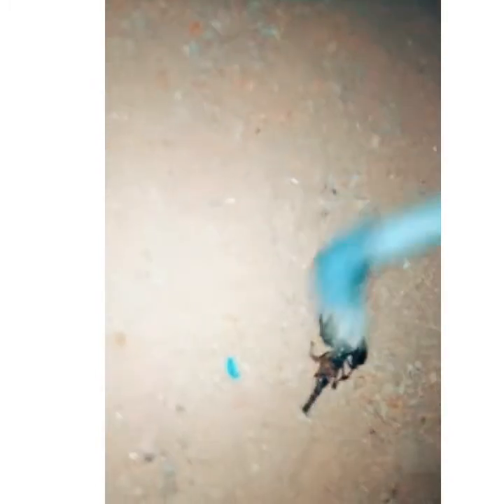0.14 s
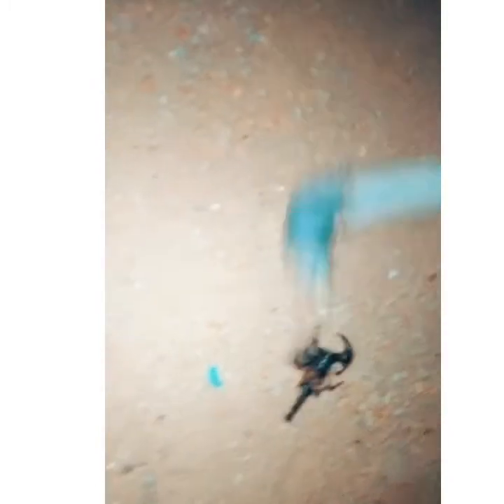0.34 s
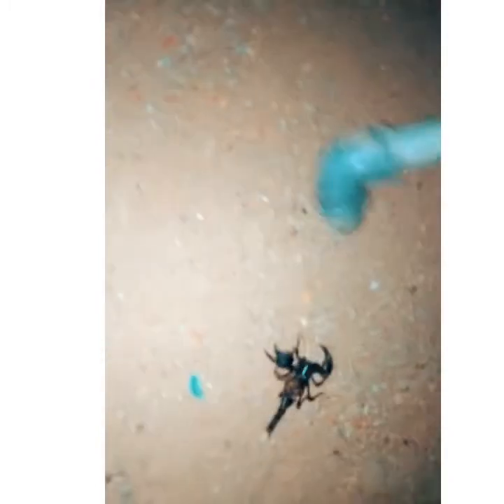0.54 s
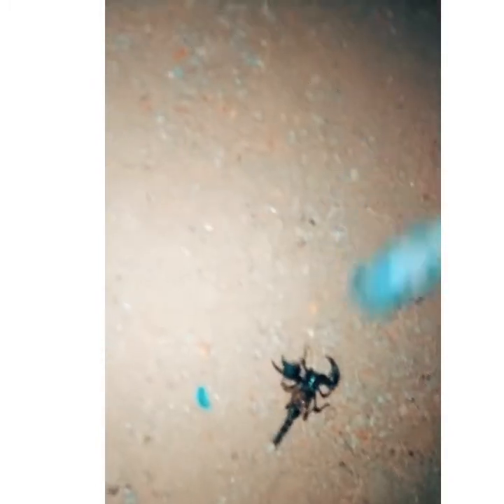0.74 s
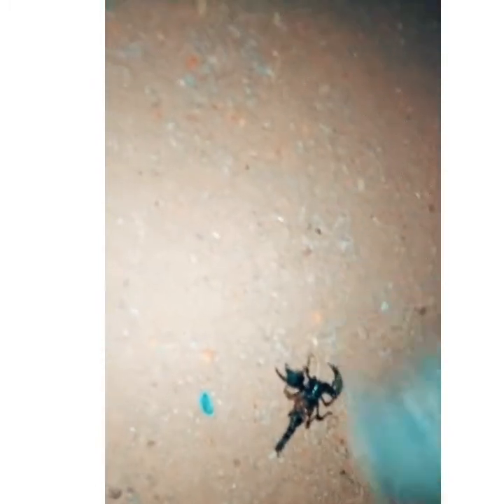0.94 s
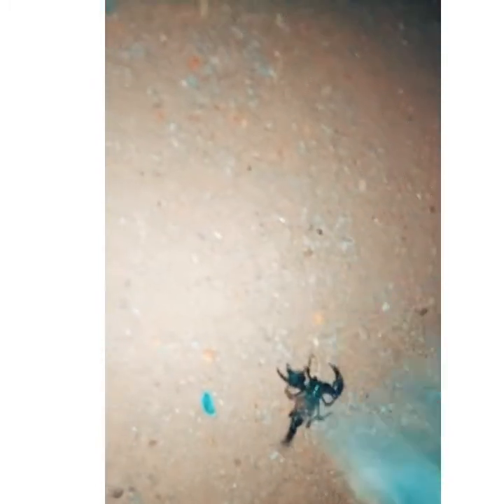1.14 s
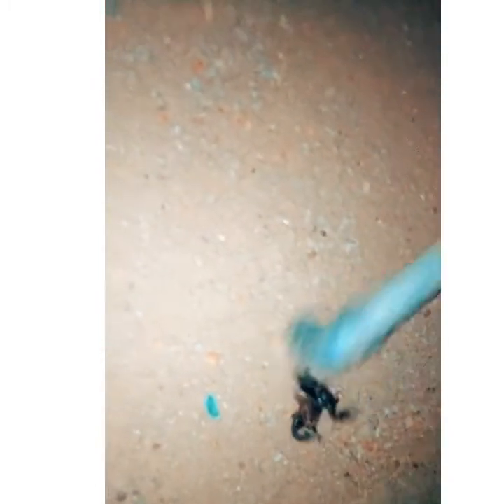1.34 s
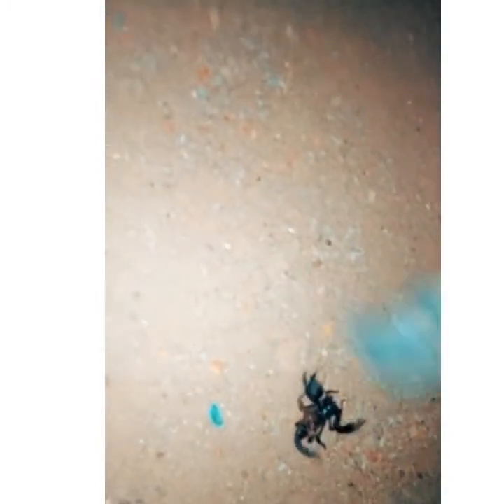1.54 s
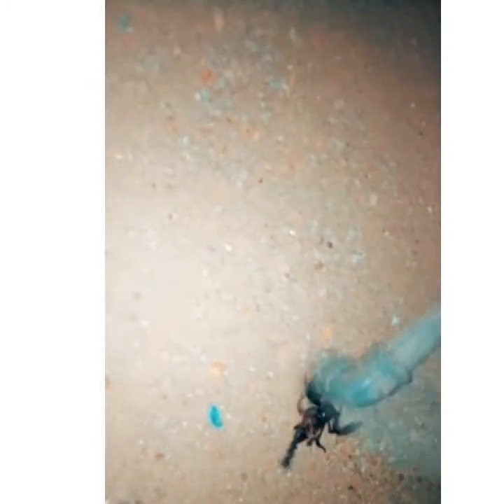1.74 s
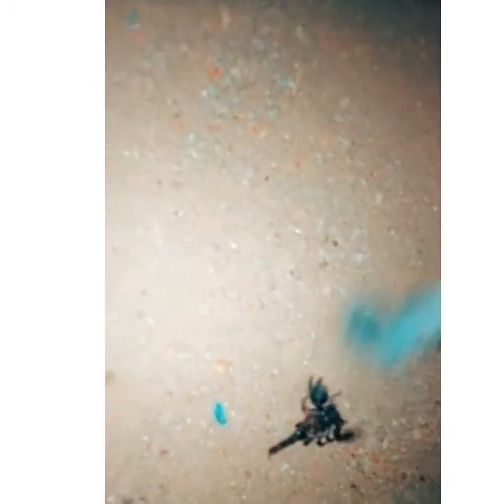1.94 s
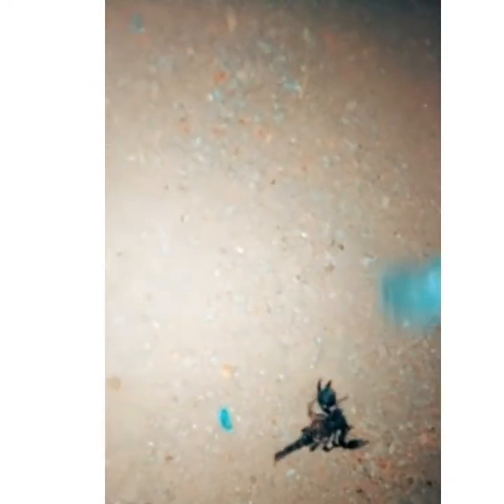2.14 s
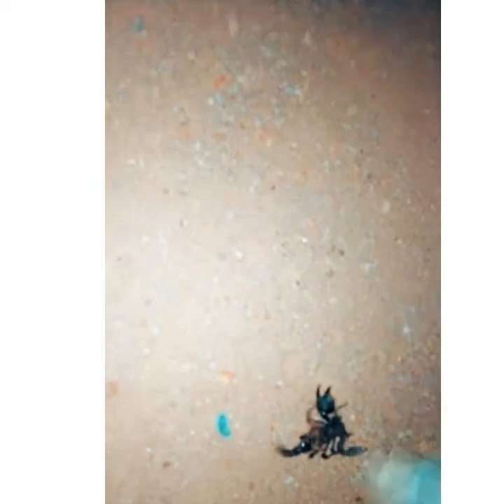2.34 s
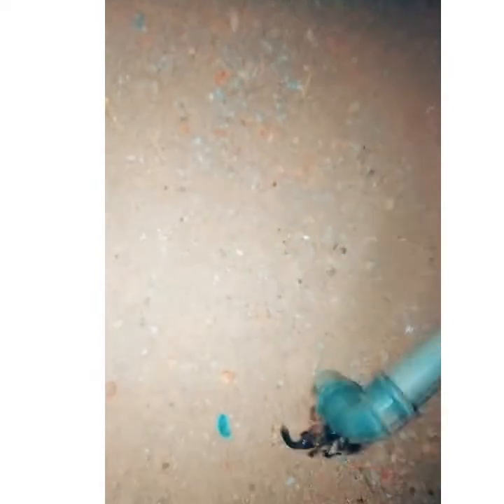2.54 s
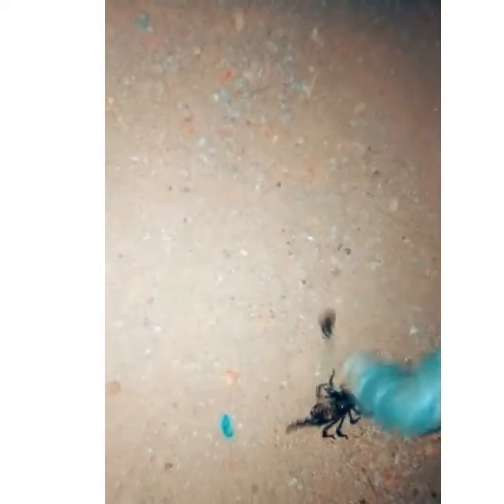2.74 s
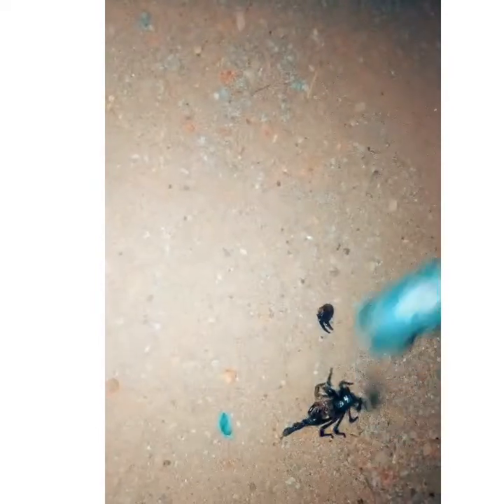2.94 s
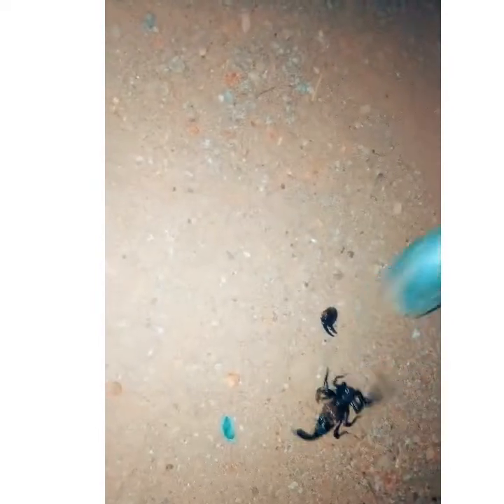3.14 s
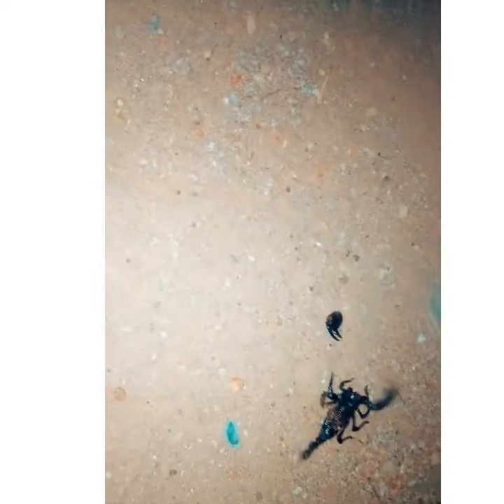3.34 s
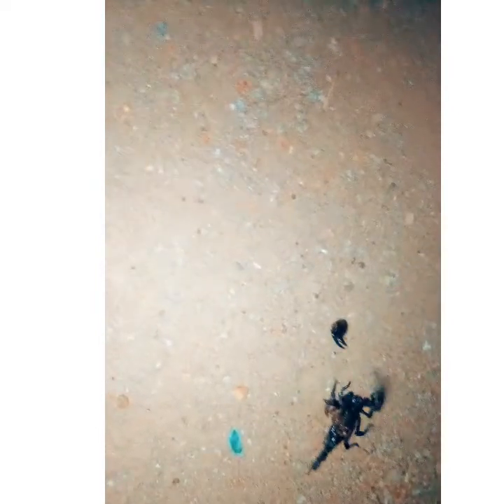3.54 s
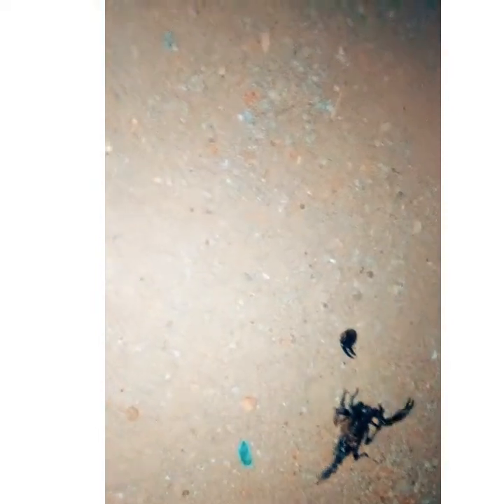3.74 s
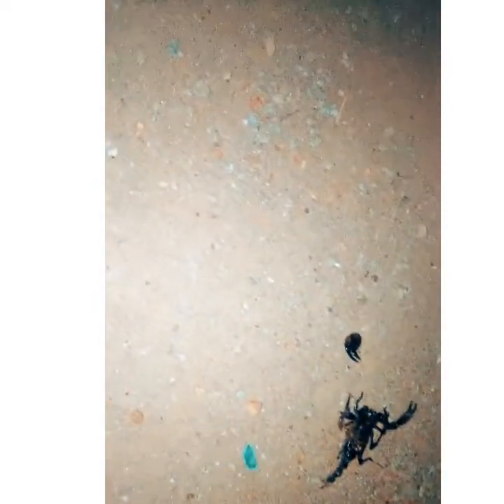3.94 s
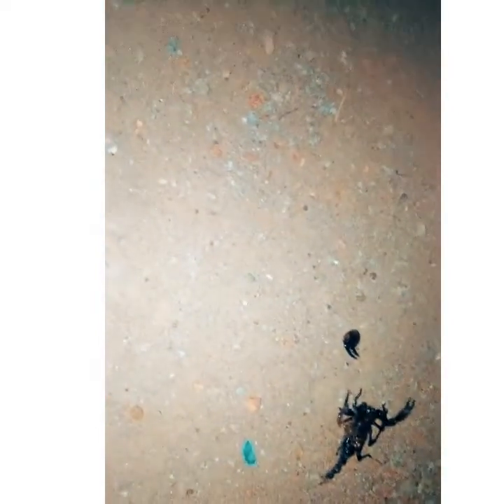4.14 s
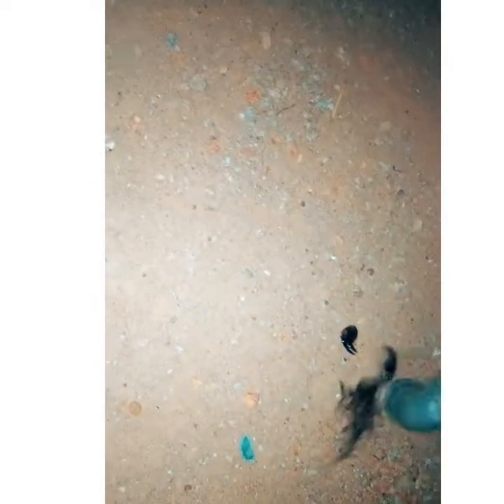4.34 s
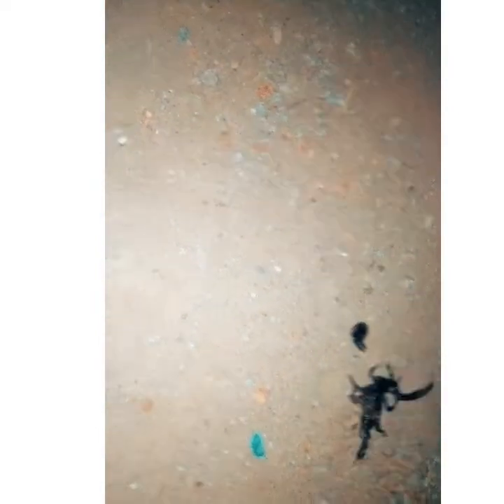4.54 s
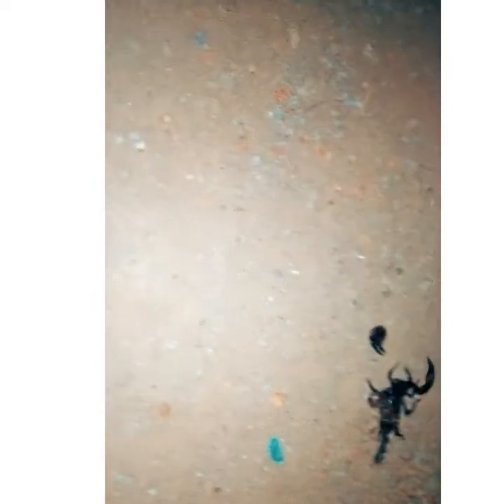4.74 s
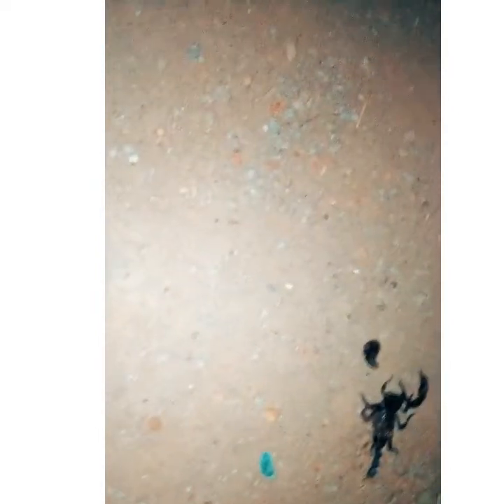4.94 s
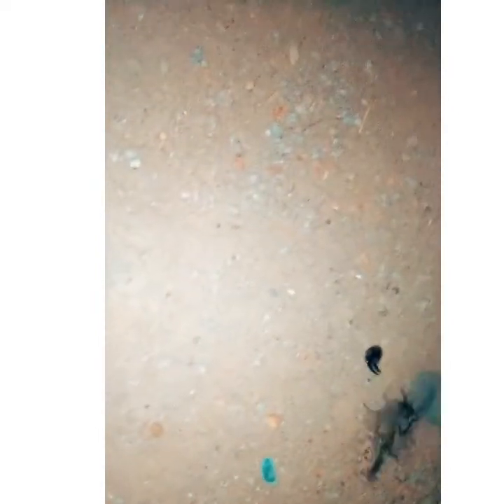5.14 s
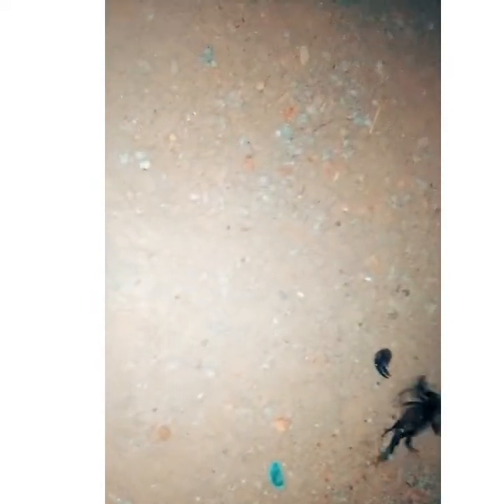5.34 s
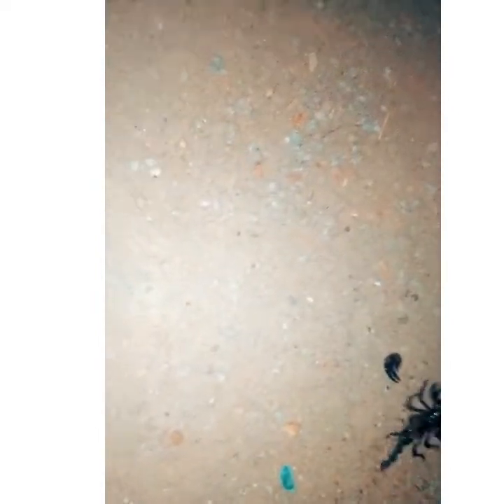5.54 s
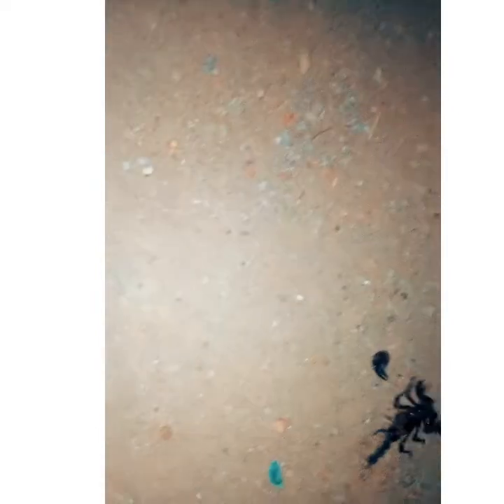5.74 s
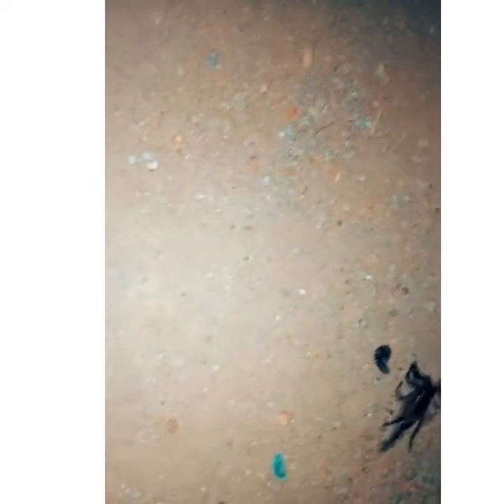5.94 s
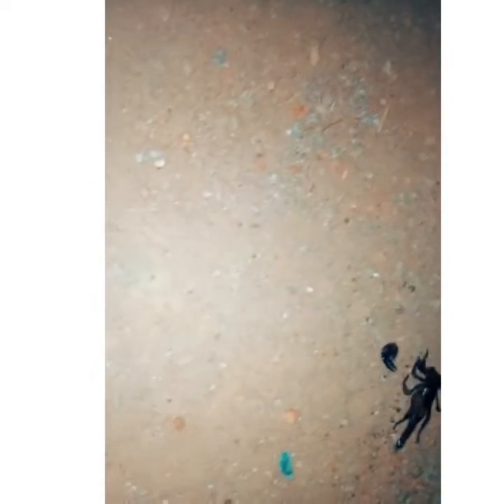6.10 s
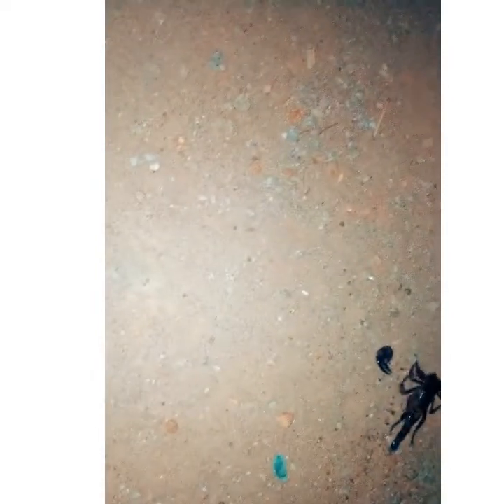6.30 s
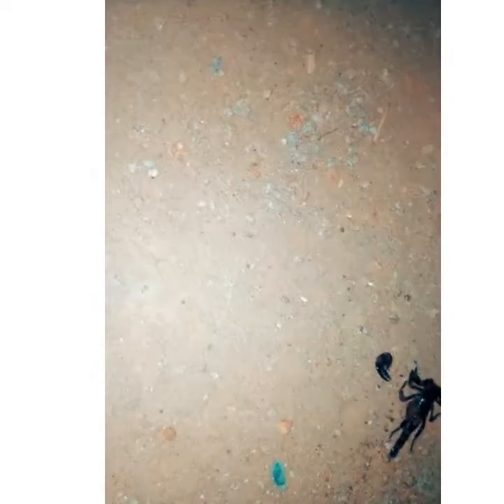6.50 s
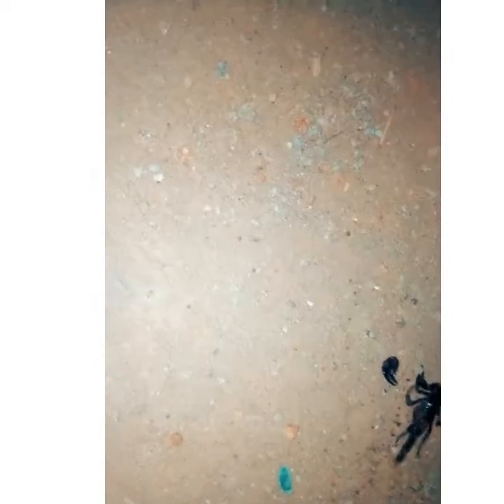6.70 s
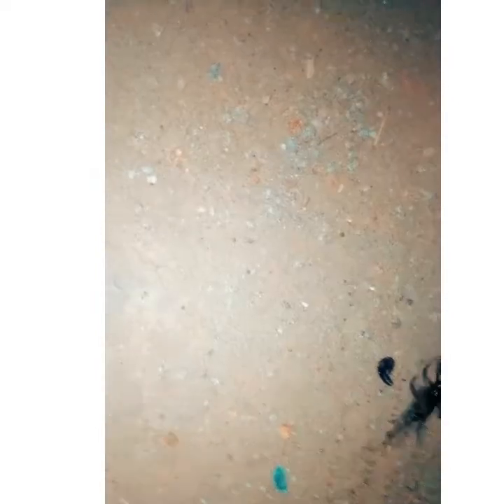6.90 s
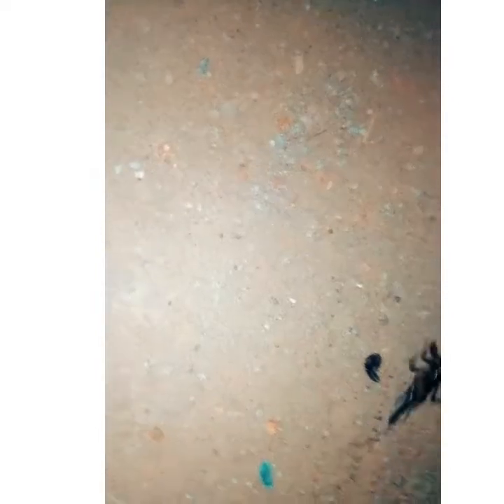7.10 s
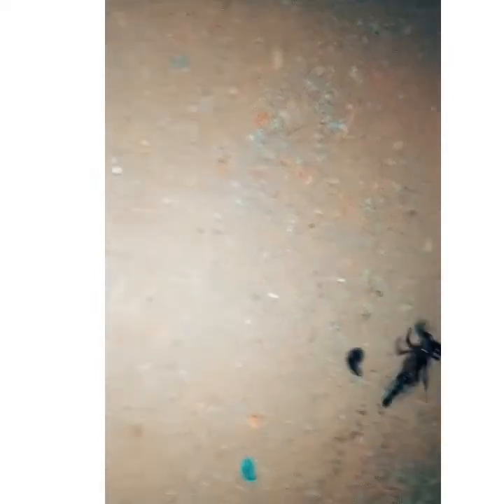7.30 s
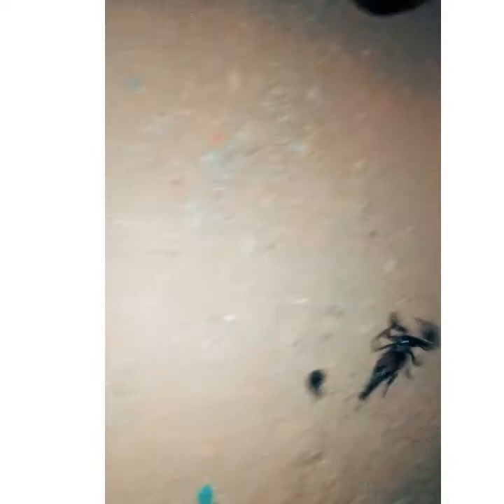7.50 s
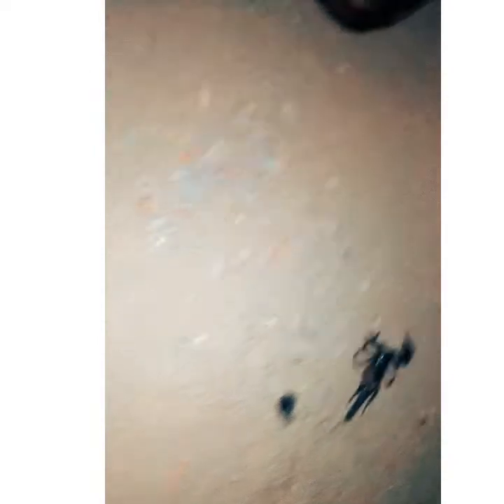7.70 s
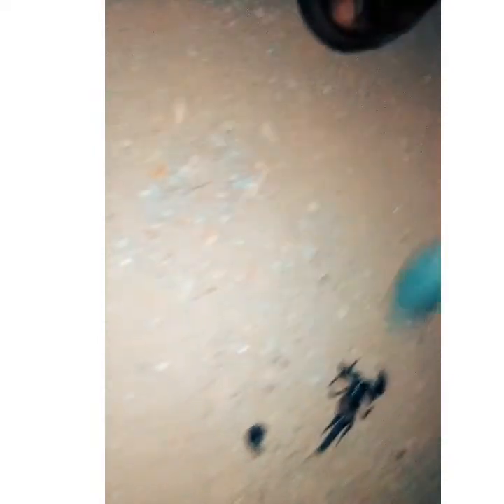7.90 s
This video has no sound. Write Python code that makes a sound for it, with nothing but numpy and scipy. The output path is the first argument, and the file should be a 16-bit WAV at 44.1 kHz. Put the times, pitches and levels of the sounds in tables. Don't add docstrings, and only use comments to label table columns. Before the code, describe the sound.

A hollow plastic pipe elbow knocks gritty concrete in loud, irregular cracks with small bouncing rattles, over faint night crickets and distant hum.

```python
import sys
import numpy as np
from scipy import signal
from scipy.fft import rfft, irfft, next_fast_len
from scipy.io import wavfile
from scipy.ndimage import map_coordinates

SR = 44100
rng = np.random.default_rng(int(sys.argv[2]) if len(sys.argv) > 2 else 0)


def unload_audio(sound):
    columns = np.transpose(np.atleast_2d(sound))
    steps = np.round(np.clip(columns, -1, 1) * 32767)
    wavfile.write(sys.argv[1], SR, steps.astype(np.int16))


def attenuation_scalar(level_db):
    decades = np.asarray(level_db, float) / 20
    return 10 ** decades


N = 350991

# pitch_hz, level_db (per Hz)
NIGHT_COLOR = [(20, -5), (50, 1.5), (100, 0.5), (250, -7.5), (700, -11.5), (2000, -17), (5300, -18.5),
               (7300, -25.5), (8000, -30), (11000, -31.5), (14000, -32.5), (15000, -19.5), (15400, -23),
               (15600, -62.5)]
# pitch_hz, level_db (rms)
CIRCUIT_WHINE = (11000, -100)
# pitch_hz, width_hz, level_db (rms), pulses_per_s, swell_db
CRICKET_CROWDS = [(4215, 170, -84, 21, 6), (5857, 230, -66, 59, 2), (6035, 160, -66.5, 28, 1),
                  (6510, 550, -70, 31, 4), (7036, 420, -77, 24, 0.5)]
# peak_s, level_db (rms), pitch_hz, fade_s (time to fall 20 dB)
NEAR_CHIRPS = [(.48, -77, 4178, .06), (.85, -78.5, 4240, 0.3), (1.14, -74, 4240, 0),
               (1.445, -70, 4249, .06), (1.672, -67.5, 4190, 0.08), (1.981, -61, 4215, 0.1),
               (2.28, -61, 4210, 0.12), (2.895, -56, 4200, 0.04), (3.02, -73.5, 4246, 0.33),
               (3.29, -75, 4160, 0.23), (3.665, -64, 4223, 0.03), (3.995, -69.5, 4230, 0.14),
               (4.31, -63.5, 4280, .08), (4.634, -59.5, 4275, .06), (4.96, -68, 4300, 0.2),
               (5.07, -71, 4200, 0.35), (5.585, -71.5, 4260, 0.2), (5.78, -77, 4200, 0.16),
               (5.91, -75, 4250, .08), (6.225, -71, 4286, 0.14), (6.53, -64.5, 4224, 0.07),
               (6.88, -59, 4248, 0.06), (7.25, -63.5, 4257, 0.08), (7.6, -75, 4180, 0.1),
               (7.805, -70, 4095, .06)]
# start_s, length_s, pitch_hz, level_db (rms)
FAR_INSECTS = [(1.984, 0.19, 1840, -78), (1.0, .15, 2600, -84), (3.032, 0.099, 1090, -76),
               (4.618, .15, 2600, -79.5), (5.74, 0.25, 2600, -84), (6.5, 0.23, 3530, -86),
               (6.66, 0.16, 3500, -80), (7.6, 0.31, 3190, -83.5)]
# start_s, level_db (rms), length_s
HAND_JOLTS = [(1.197, -52, .08), (1.27, -57, .12), (1.757, -56.5, .17), (2.447, -58, 0.19),
              (4.36, -58.5, 0.11), (4.46, -58.5, .07), (5.221, -62, 0.16), (5.64, -67, .12), (6.8, -67, .1)]
# start_s, peak_db, first_touch_early_s, first_touch_db, spark_share_db
HARD_KNOCKS = [
    (1.1906, -4.5, 0.0023, -9, 1.5),
    (1.7643, -2.5, 0.0036, -10, 2),
    (2.4531, 1, .0025, -6.5, -3),
    (4.3605, -1.5, 0.0067, -6.5, -3),
    (5.1646, -2, .0047, -7, 3.5),
    (6.7964, -16, 0.008, -25, -7.5),
]
# start_s, peak_db, rim_share_db, t60_s
PIPE_BOUNCES = [(1.2451, -23, -3, 0.044), (1.293, -30, -5, 0.08), (1.304, -30, -1, .05),
                (1.3201, -24, -1, .042), (1.352, -42.5, 4, 0.097), (1.7912, -23, -10, 0.02),
                (1.8546, -27, -6, 0.053), (1.867, -26.5, -4, .05), (1.876, -26.5, -10, .02),
                (1.884, -29, -6, 0.098), (2.553, -29, -6, 0.12), (2.5744, -23, -14, 0.033),
                (2.5986, -32.5, -0.5, 0.13), (4.4633, -19.5, -4, 0.032), (4.472, -32, 2, .07),
                (5.2384, -19.5, -16, 0.053), (5.250, -22.5, 0, 0.08), (5.3103, -33, 1, 0.085),
                (6.7754, -29.5, 10.5, 0.054), (6.878, -39.5, 2, .14)]
# start_s, peak_db, rim_share_db, t60_s
RIM_DRAGS = [(0.2039, -20, 10, 0.016), (.206, -30.5, 12, 0.066), (.2258, -31, 0, 0.044),
             (.2346, -33, 9, 0.044), (.241, -31, 0, .07), (0.247, -29, 3, .025), (.258, -34, 0, 0.065),
             (.268, -33.5, 15.5, 0.084), (0.2878, -30, 9, .015), (.290, -27, 7.5, .035)]
# start_s, peak_db, t60_s
STONE_LANDINGS = [(.0278, -40.5, .045), (1.337, -25, 0.018), (1.9369, -15.5, 0.02), (2.6973, -40, .1),
                  (4.4432, -15.5, .025), (4.4535, -28, .02), (4.6149, -40, .04), (5.318, -37, 0.026),
                  (5.4914, -43, .022), (6.8468, -36, .015)]
# pitch_hz, level_db (per Hz)
GRIT_COLOR = [(400, -39), (1000, -17.5), (2000, -16), (3900, -10), (5080, -4), (5600, -5), (6340, 0),
              (7000, -8.5), (7700, -22), (9000, -40.5), (12000, -73), (16000, -110)]
# pitch_hz, width_hz, level_db
RIM_RESONANCES = [(1320, 120, -10.5), (2549, 260, -1), (3384, 700, -7.5), (4820, 600, -2.5)]
# pitch_hz, level_db (per Hz)
SPARK_COLOR = [(5000, -28.5), (7700, -1), (9500, -9.5), (12500, -18.5), (14000, -12.5), (15000, -9),
               (15700, -16), (16500, -44)]
# start_s, peak_db, first_mode_hz, contact_s, wall_thump_db
PIPE_BLOWS = [(.25, -39, 467, 0.00074, -7), (1.1902, -7, 450.3, 0.00053, 6),
              (1.3218, -27.5, 450, 0.00063, 1), (1.7639, -8.5, 369.4, 0.0006, 3.5),
              (1.855, -32, 400, 0.00023, 4), (1.867, -31, 397.4, 0.00014, 1.5),
              (2.4532, -17, 453.3, 0.00026, 8), (2.574, -34.5, 427, 0.00026, -9),
              (4.360, -8, 359, 0.00031, 4), (4.463, -36, 405, 0.00067, -3), (5.005, -52, 430, 0.00092, 5),
              (5.160, -19, 400, .0003, -9.5), (5.1642, -3.5, 368.9, 0.00037, 6),
              (5.183, -21, 361, 0.0018, -5), (5.2394, -20, 394, 0.00077, 7.5),
              (6.788, -32, 473, 0.00023, -10), (6.796, -24.5, 463, 0.00018, -4)]
# above_first_mode_hz, level_db, ring_time_share (no unit)
AIR_MODES = [(0, -0.5, 0.91), (483.6, 0, 1.2), (946, -5.5, .8), (1390, -11.5, 0.77), (1830, -12, .6),
             (2280, -15, .6)]
# pitch_hz, level_db, t60_s
WALL_MODES = [(336.2, 1, .03), (690, -7, .02), (850, -9, .03), (1285, -1.5, 0.047), (1550, -8, .015)]
# pitch_hz, level_db (per Hz)
THUD_COLOR = [(40, -40), (110, -24.5), (250, -10), (400, 0), (670, -2), (1000, -10.5), (1300, -2),
              (1700, -11.5), (2500, -20), (5000, -79.5)]
# pitch_hz, t60_s
YARD_ECHO = [(100, 0.21), (320, 0.42), (430, 0.44), (580, .3), (2000, 0.25), (6000, 0.25), (12000, .2)]


def unit(x):
    return x / np.sqrt(np.mean(x ** 2) + 1e-20)


def along(points, hz):
    point_hz, value = np.transpose(points)
    return np.interp(np.log(hz + 1), np.log(point_hz + 1), value)


def wobble(rate):
    knots = rng.standard_normal(int(N * rate / SR) + 4)
    return map_coordinates(knots, [np.arange(N) * rate / SR])


def noise(gain):
    size = next_fast_len(N)
    spectrum = rfft(rng.standard_normal(size)) * gain(np.fft.rfftfreq(size, 1 / SR))
    return unit(irfft(spectrum, size)[:N])


def causal(x, points):
    size = 4096
    level_db = along(points, np.fft.rfftfreq(size, 1 / SR))
    cepstrum = irfft(np.log(attenuation_scalar(level_db) + 1e-6))
    cepstrum[1:size // 2] *= 2
    cepstrum[size // 2 + 1:] = 0
    response = irfft(np.exp(rfft(cepstrum)))[:size // 2]
    return signal.fftconvolve(x, response / np.linalg.norm(response))[:len(x)]


def highpass(x, hz):
    return signal.sosfilt(signal.butter(2, hz, "high", fs=SR, output="sos"), x)


def add(track, s, x):
    track[round(s * SR):][:len(x)] += x


def night():
    night_db = -64
    air = noise(lambda f: attenuation_scalar(along(NIGHT_COLOR, f)))
    rumble = noise(lambda f: attenuation_scalar(along(NIGHT_COLOR, f)) * (f < 300)) * attenuation_scalar(2.5 * wobble(2.6))
    whine_hz, whine_db = CIRCUIT_WHINE
    whine = attenuation_scalar(whine_db + 4) * np.sin(2 * np.pi * whine_hz * np.arange(N) / SR)
    return attenuation_scalar(night_db - 0.5) * air + attenuation_scalar(night_db - 6.5) * rumble + whine


def cricket_chorus():
    t, out = np.arange(N) / SR, np.zeros(N)
    for hz, width, db, rate, swell_db in CRICKET_CROWDS:
        band = noise(lambda f: 1 / (1 + ((f - hz) / (width / 2)) ** 2))
        pulses = 1 + 0.35 * np.sin(2 * np.pi * rate * t + 1.9 * wobble(4))
        swell = attenuation_scalar(swell_db * wobble(6.5) + 0.91 * wobble(1.0))
        out += attenuation_scalar(db) * unit(band * pulses * swell)
    return out


def near_cricket():
    t, out = np.arange(N) / SR, np.zeros(N)
    roundness = 1.4
    blur, tremble_db = 1.3 * wobble(60), 4.5 * wobble(35)
    for s, db, hz, fade in NEAR_CHIRPS:
        near = slice(max(round((s - 2 * fade) * SR), 0), round((s + 2 * fade) * SR))
        swell_db = db - 20 * abs((t[near] - s) / fade) ** roundness
        tone = np.sin(2 * np.pi * hz * t[near] + blur[near])
        out[near] += attenuation_scalar(swell_db + 1.5 + tremble_db[near]) * tone
    return out


def far_insects():
    t, out = np.arange(N) / SR, np.zeros(N)
    for s, length, hz, db in FAR_INSECTS:
        swell = np.sin(np.pi * np.clip((t - s) / length, 0, 1))
        tone = np.sin(2 * np.pi * hz * t + 0.84 * wobble(45))
        out += attenuation_scalar(db + 5 + 3.4 * wobble(37)) * swell * tone
    return out


def jolts():
    shudder_hz = 75
    out, shudder = np.zeros(N), noise(lambda f: 1 / (1 + (f / shudder_hz) ** 2))
    for s, db, length in HAND_JOLTS:
        piece = shudder[round(s * SR):][:round(length * SR)]
        add(out, s, attenuation_scalar(db + 6.5) * unit(piece) * np.hanning(len(piece)))
    return out


def contacts():
    rows = []
    for s, db, rim_db, t60 in RIM_DRAGS:
        rows.append((s, db, rim_db, t60, -22, False))
    for s, db, t60 in STONE_LANDINGS:
        rows.append((s, db, -20, t60, -19, True))
    for s, db, rim_db, t60 in PIPE_BOUNCES:
        spark_db = -1.5 + 0.35 * min(rim_db, 0)
        rows.append((s, db, rim_db, t60, spark_db, False))
    for s, db, early, touch_db, spark_db in HARD_KNOCKS:
        steps = [(-early, touch_db, 0.022),
                 (0, db, 0.02),
                 (0.0026, db - 9, 0.045),
                 (0.011, db - 17, 0.05)]
        for later, level_db, t60 in steps:
            rows.append((s + later, level_db, -5, t60, spark_db, False))
    return rows


def grit():
    pipe_grit, rim, spark, stones = np.zeros((4, N))
    t = np.arange(SR // 6) / SR
    for s, db, rim_db, t60, spark_db, loose in contacts():
        life = max(t60, 0.004)
        shape = attenuation_scalar(-60 * t / life) * (1 - np.exp(-t / (0.69 * life ** 2)))
        grain_size = attenuation_scalar(3.8 * rng.standard_normal(len(t)))
        cracks = shape * rng.standard_normal(len(t)) * grain_size / 1.4
        cracks[:1] += 0.074 / life
        add(stones if loose else pipe_grit, s, attenuation_scalar(db - 6.5) * cracks)
        add(rim, s, attenuation_scalar(db - 6.5 + rim_db - 10) * cracks)
        add(spark, s, attenuation_scalar(db - 6.5 + spark_db - 19) * cracks)
    hz = np.geomspace(100, SR / 2, num=300)
    rim_power = sum(attenuation_scalar(2 * db) / (1 + ((hz - center) / (width / 2)) ** 2) ** 1.6
                    for center, width, db in RIM_RESONANCES)
    rim_color_db = 10 * np.log10(rim_power) - 40 * (hz / 12000) ** 2
    ground = pipe_grit + highpass(stones, 4500)
    rim_sound = causal(rim, np.transpose([hz, rim_color_db]))
    return causal(ground, GRIT_COLOR) + rim_sound + causal(spark, SPARK_COLOR)


def pipe():
    ring, thud, t = np.zeros(N), np.zeros(N), np.arange(SR // 3) / SR
    ring_t60_s = 0.11
    for s, db, hz, touch, wall_db in PIPE_BLOWS:
        sway = np.cumsum(rng.standard_normal((len(AIR_MODES), len(t))), axis=1) * 0.075
        body = np.zeros(len(t))
        for (up, level, share), drift in zip(AIR_MODES, sway):
            fade = attenuation_scalar(level - 60 * t / (share * ring_t60_s))
            body += fade * np.sin(2 * np.pi * (hz + up) * t + drift)
        for wall_hz, level, life in WALL_MODES:
            body += attenuation_scalar(level + wall_db - 60 * t / life) * np.sin(2 * np.pi * wall_hz * t)
        push = np.exp(-((t[:200] - touch) / (0.5 * touch)) ** 2)
        add(ring, s, attenuation_scalar(db - 12) * np.convolve(body, push / push.sum())[:len(t)])
        thud_shape = attenuation_scalar(db + wall_db - 9 - 60 * t / 0.047) * (1 - np.exp(-t / 0.00088))
        add(thud, s, thud_shape * rng.standard_normal(len(t)))
    return highpass(ring, 130) + causal(thud, THUD_COLOR)


def yard(x, wet_db):
    out, step = np.zeros(N + SR), SR // 4
    for start in range(0, N, step):
        hz, t, cells = signal.stft(rng.standard_normal(SR // 2), SR, nperseg=512)
        fade = attenuation_scalar(-60 * t / along(YARD_ECHO, hz)[:, None])
        tail = signal.istft(cells * fade, SR, nperseg=512)[1]
        echo = signal.fftconvolve(x[start:start + step], tail / np.linalg.norm(tail))
        add(out, start / SR + 0.006, echo)
    return attenuation_scalar(wet_db) * out[:N]


def scene():
    background = night() + cricket_chorus() + near_cricket() + far_insects()
    cracks, body = grit(), pipe()
    echoes = yard(cracks, wet_db=-13.5) + yard(body, wet_db=-16)
    return (background + jolts() + echoes + cracks + body)[None]


def low_pass(x):
    return signal.sosfilt(signal.butter(12, 16660, fs=SR, output="sos"), x)


def record(dry):
    heard = highpass(dry, 70)
    clipped = np.clip(heard, -1.0, 1.0)
    top_cut = signal.cheby2(12, 80, 17100, fs=SR, output="sos")
    mix = signal.sosfiltfilt(top_cut, clipped)
    return low_pass(mix)


dry = scene()
out = record(dry)
unload_audio(out)
```